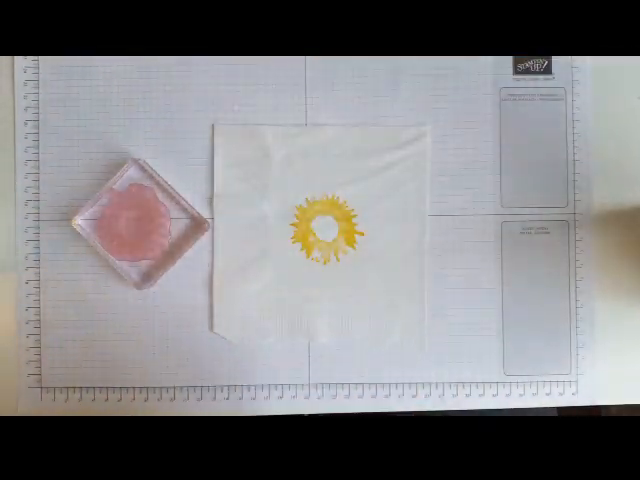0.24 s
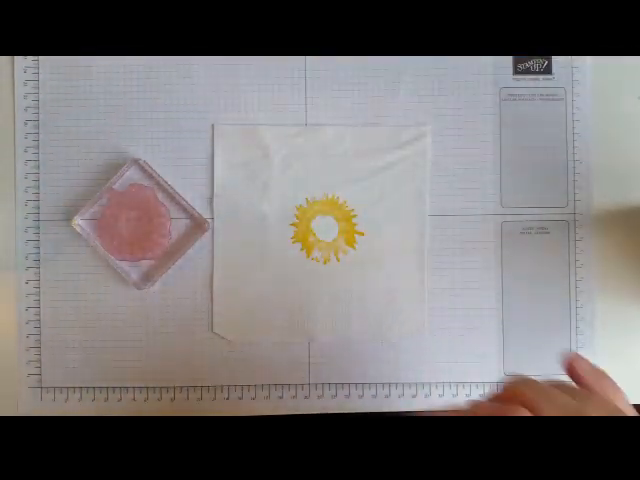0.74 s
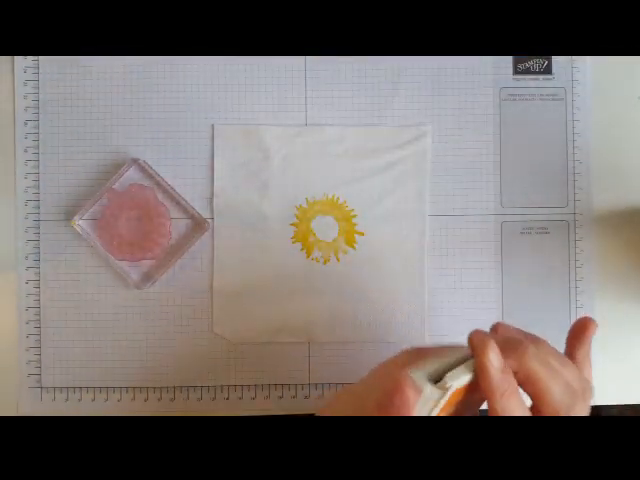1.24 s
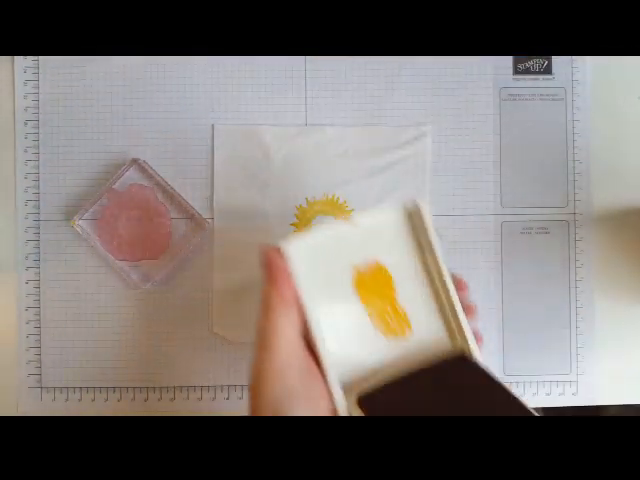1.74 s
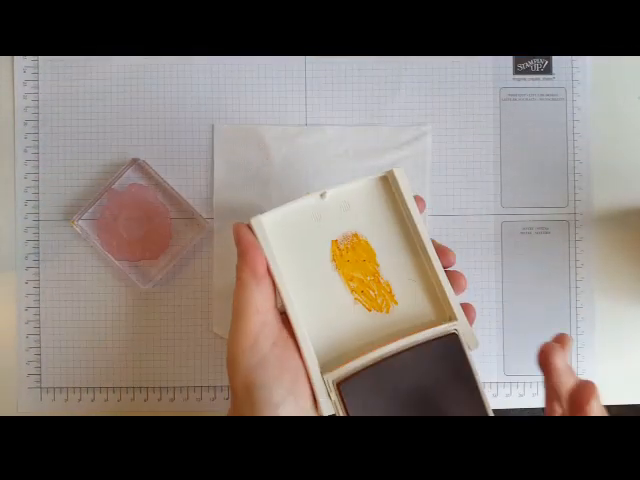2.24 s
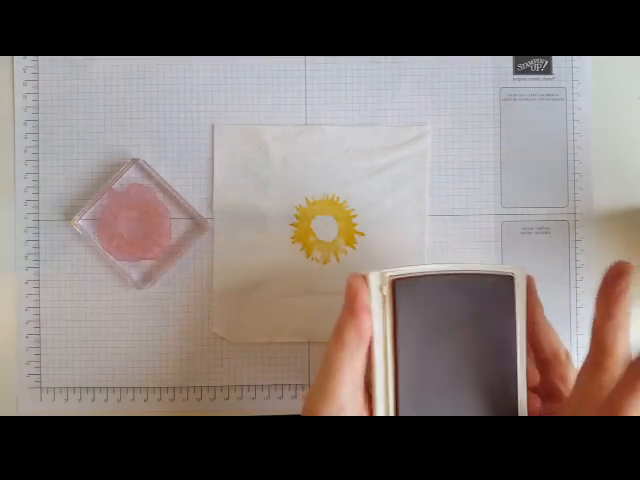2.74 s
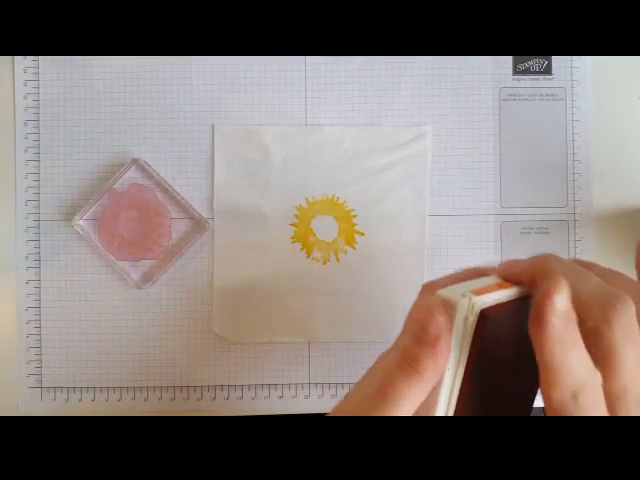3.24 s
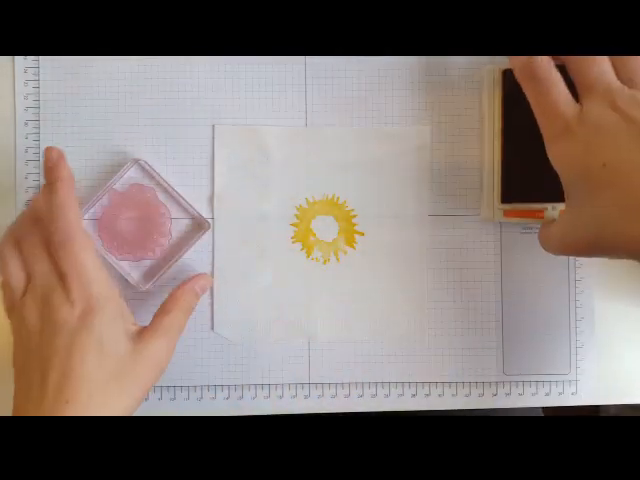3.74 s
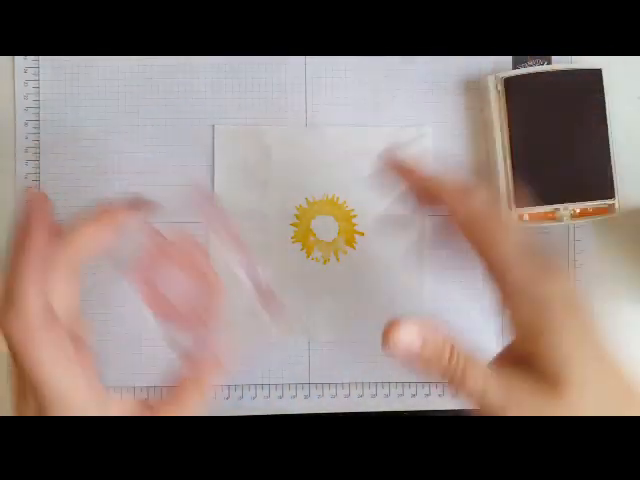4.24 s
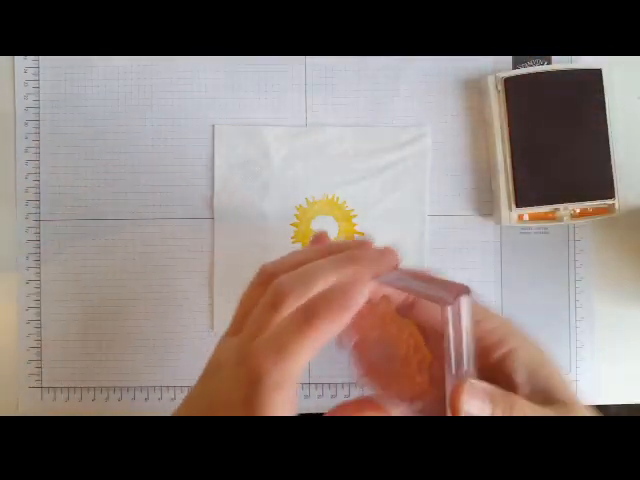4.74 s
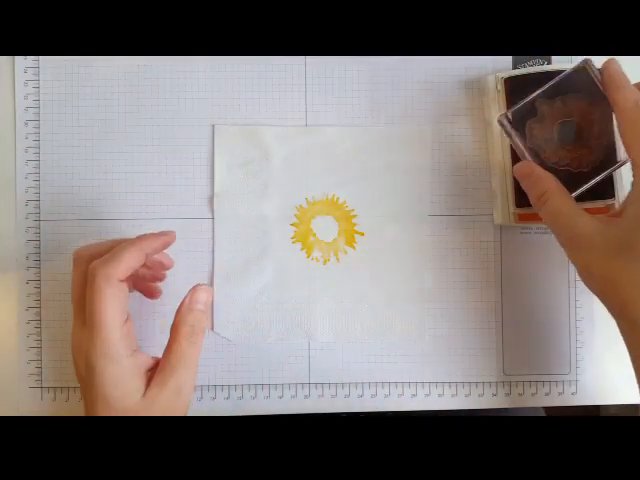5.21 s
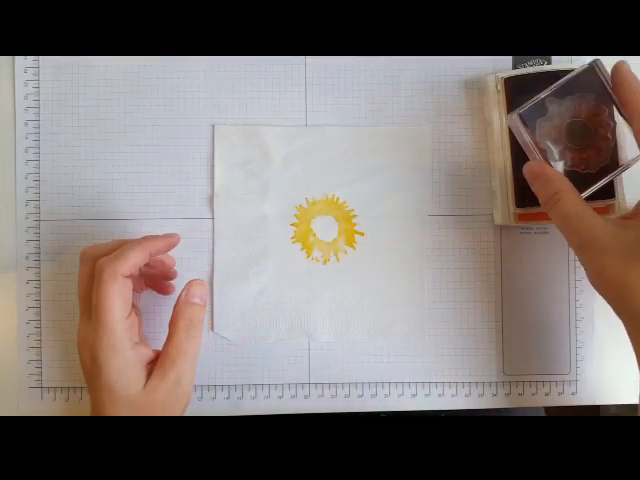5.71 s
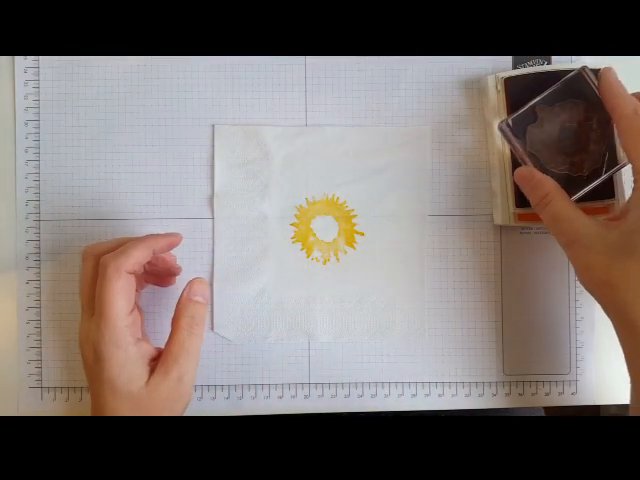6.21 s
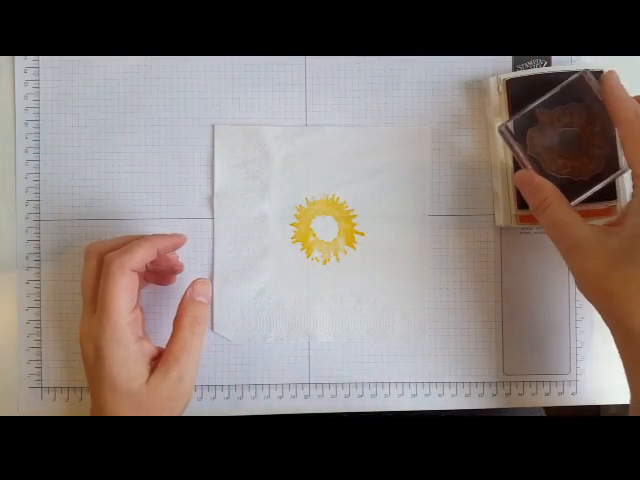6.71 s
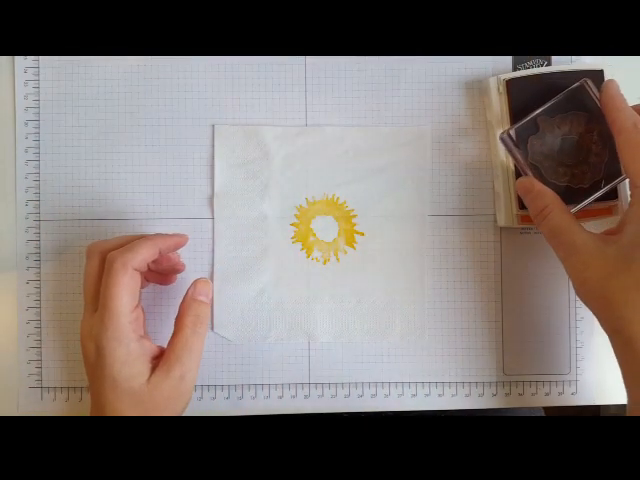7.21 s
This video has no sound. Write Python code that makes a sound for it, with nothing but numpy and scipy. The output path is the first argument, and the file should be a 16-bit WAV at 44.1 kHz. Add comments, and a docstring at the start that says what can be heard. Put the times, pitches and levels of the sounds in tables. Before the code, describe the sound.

Off-side clack and thin squeak, then plastic clicks, a scraping lid latching, a double set-down knock, and dull padded thumps with tacky crackles.

```python
"""A plastic ink pad case is prised open, slid shut until it latches and set down: blows and friction excite
damped modes of its walls and hollow tray. An acrylic stamp block then pats the pad five times, as soft pushes
that ring the table, and the tacky ink peels at each lift in strings of tiny decaying pings. Beforehand a clack
(filtered noise and modes) and a squeak (gliding sines) sound out of sight. Room echoes carry all of this over
a low, swelling rumble and a faint hiss of coloured noise."""
import sys
import numpy as np
from scipy import signal
from scipy.fft import rfft, irfft, next_fast_len
from scipy.io import wavfile
from scipy.ndimage import uniform_filter1d

SR = 44100
rng = np.random.default_rng(int(sys.argv[2]) if len(sys.argv) > 2 else 0)


def wrap_up_sound(samples):
    """Save the sound to the file named by the first command line argument, as 16-bit audio."""
    columns = np.atleast_2d(samples).T
    # keep every value between -1 and 1, then stretch to whole-number steps
    tamed = np.clip(columns, -1, 1)
    steps = np.round(tamed * 32767).astype(np.int16)
    wavfile.write(sys.argv[1], SR, steps)


N = 329338
T = np.arange(N) / SR
AGE = T[:SR // 2]  # seconds since a blow
BLOW_SIZE = SR // 50  # 20 ms: judges a blow's level, and holds the ring of one ink thread

# Clicks of the case. Each row: start in seconds, body level in dB, bass re body in dB, treble re body in dB,
# tray resonance in Hz, tray ring in dB.
CASE_CLICKS = [(.872, -51.5, 7.5, -12, 1160, -2), (.893, -45, -7, -4.5, 1340, -2),
               (1.001, -52.5, 2.5, -13, 1290, -1), (1.062, -41.5, -2, -5, 1090, -8),
               (1.118, -41.5, -4.5, -13.5, 1070, 10.5), (1.165, -59, 5, -12, 800, -4),
               (1.187, -50.5, 2, -33, 1207, 11.5), (1.3775, -28.5, -5, -12, 1054, -14),
               (1.557, -48.5, -8, -12.5, 1277, 5), (1.573, -41.5, -2, -20, 1398, 4.5),
               (1.599, -43, -10, -31, 1192, 6), (1.611, -52.5, -9.5, -24.5, 2500, 9),
               (1.758, -46.5, 2, -22, 1022, 5), (1.835, -37.5, -2, -32, 1250, 10.5),
               (1.866, -47, 0, -23, 950, 9), (1.879, -25.5, -10, -27.5, 1192, 9.5),
               (1.921, -37.5, 0.5, -23, 1166, 5), (1.933, -46, -5, -18, 2100, -1),
               (1.960, -39.5, 2, -11, 890, -4), (1.967, -35.5, -9.5, -26, 1065, 2),
               (2.006, -40.5, -15, -32, 1110, 6), (2.342, -60, 1, -24, 1125, 12),
               (2.433, -48, -11.5, -16, 3104, -1), (2.452, -39, -4.5, -21, 2715, 2.5),
               (2.4841, -33, -9.5, -18, 2452, 3), (2.492, -41, -9, -22, 2316, 3.5),
               (2.5185, -42, -12, -20.5, 2400, 5), (2.533, -43.5, -11.5, -20, 1196, 3),
               (2.5785, -43, -15.5, -17.5, 3016, -5), (2.594, -43, -15, -20, 1603, 4.5),
               (2.634, -25.5, -19.5, -7.5, 1077, 3), (2.643, -40, -5.5, -20.5, 1748, 16),
               (2.978, -64.5, -13, 0, 1180, 15), (2.998, -57.5, -14, 0.5, 1215, 23)]
# Crack of a click: decay when treble equals body, dB of dullness that halve it, upper limit
CRACK_T60_S, CRACK_HALVING_DB, CRACK_LONGEST_S = 0.049, 25, 0.033
# Wall resonances of the case. Each row: frequency in Hz, level in dB, t60 in seconds.
CASE_MODES = [(385, -0.5, 0.056), (430, -12.5, 0.04), (498, -3.5, 0.067), (577, -12, 0.064),
              (783, -12, 0.11), (1620, -5.5, 0.037), (1820, -1.5, 0.047), (2080, -0.5, 0.035),
              (2086, 2, 0.049), (2343, -6.5, 0.06), (2580, -9.5, 0.083), (2788, -6.5, 0.055),
              (3445, -18, 0.058)]
# Spectrum of a blow on plastic. Each row: frequency in Hz, level in dB.
PLASTIC_COLOUR = [(150, -18.5), (280, -7.5), (800, -6.5), (1200, 2), (1500, -2.5), (2300, 0.5),
                  (3200, -4.5), (4500, -9), (6500, -14), (8500, -12), (11000, -21.5), (15000, -27.5)]

# Blows of the latching lid. Each row: start in seconds, level in dB.
LATCH_BLOWS = [(2.7665, -36), (2.7686, -19.5), (2.7734, -30.5)]
# Resonances of the shut case. Each row: frequency in Hz, level in dB, t60 in seconds.
LATCH_MODES = [(276.6, -6.5, .07), (372, -2.5, 0.065), (637, -2, .03), (1077, 6, .027), (1707, -3.5, 0.014),
               (2062, 4, 0.03), (2490, 1, .024), (3500, 0.5, .016)]
# Spectrum of the latch's snap. Each row: frequency in Hz, level in dB.
LATCH_COLOUR = [(200, -13), (330, -1), (480, 0), (900, 2.5), (1400, -5.5), (2100, 5), (3050, -6),
                (3600, -3), (4200, -13), (7500, -16.5), (9200, -16.5), (11000, -28), (15000, -33)]

# Push of the lid: start, time to reach full speed, time at full speed, braking decay
SLIDE_START_S, SLIDE_ATTACK_S, SLIDE_HOLD_S, SLIDE_T60_S = 2.3, 0.22, 0.074, 0.2
# Level of the lid at full speed, and how unevenly it catches on the rails
SLIDE_DB, SLIDE_JUDDER_DB = -47.5, -2
# Light rustle of the grip while the case is being opened
GRIP_START_S, GRIP_ATTACK_S, GRIP_HOLD_S, GRIP_T60_S = 0.89, 0.084, 0.93, 0.58
GRIP_DB, GRIP_WANDER_DB = -64.5, 6
# Fingers rubbing over the case. Each row: start in seconds, level in dB, length in seconds,
# brightness in dB (treble re the rest).
FINGER_RUBS = [(0.548, -67, 0.29, 7.5), (0.767, -61, .17, 3.5), (1.097, -44, 0.047, -11),
               (1.233, -47.5, 0.053, -4.5), (1.548, -41.5, 0.056, -8), (1.694, -54, .06, -4),
               (2.963, -55, .11, -6), (3.358, -52.5, .049, 4.5)]
# Spectrum of plastic rubbing. Each row: frequency in Hz, level in dB.
SLIDE_COLOUR = [(250, -19.5), (400, -2.5), (520, 0), (800, -6), (1100, 1.5), (1450, -4.5), (2200, 0),
                (3000, -11.5), (3700, -13), (4300, -16.5), (5400, -13.5), (6300, -21), (9000, -18.5),
                (12000, -26.5), (15000, -37)]
# Scrapes of the binding lid. Each row: start in seconds, level in dB, length in seconds, centre in Hz.
LID_SCRAPES = [(1.247, -55.5, 0.039, 2250), (2.317, -58.5, 0.02, 1183), (2.404, -47.5, .04, 1145),
               (2.426, -48, 0.026, 2696), (2.503, -42, .055, 2200), (2.548, -40.5, .064, 1700)]

# Knocks of the case on the table. Each row: start in seconds, level in dB, contact cut-off in Hz,
# table thud in dB, 0 on its edge or 1 flat.
LANDINGS = [(3.863, -25.5, 2185, -37.5, 0), (3.9703, -20.5, 7960, -31, 1), (3.9793, -25.5, 6000, -42, 1)]
# Resonances of the case lying on the table. Each row: frequency in Hz, t60 in seconds,
# level in dB when struck on its edge, level in dB when struck flat.
LANDING_MODES = [(379.5, 0.087, -10, -10), (495, 0.065, -21.5, -3.5), (650.5, 0.033, 1.5, -15),
                 (766, 0.036, 3, -0.5), (1164, 0.033, -2, 2), (1530, .018, 10.5, -14),
                 (1680, .022, 1.5, -7.5), (2040, 0.018, -10, -4), (2766, 0.019, -17.5, -1),
                 (3700, .02, -23, -10.5), (4100, 0.013, -23.5, -8.5)]
# Spectrum of the case hitting the table. Each row: frequency in Hz, level in dB.
LANDING_COLOUR = [(200, -2), (400, 3), (600, -5), (800, -2.5), (1130, 6), (1350, -6), (1600, 0.5),
                  (2400, 1), (3200, -7), (5000, -14.5), (7500, -25), (9500, -21.5), (15000, -36.5)]
# Resonances of the table. Each row: frequency in Hz, level in dB, t60 in seconds.
TABLE_MODES = [(47.9, -1.5, 0.19), (70, -5, 0.37), (136, 2.5, 0.17), (203.4, -4, 0.042), (290.6, 9, 0.086),
               (404, 2.5, 0.08), (483, -6, 0.22), (565, -18.5, 0.047), (767, -13, .06)]

# Pats of the block on the pad. Each row: start in seconds, level in dB, push length in seconds,
# knock of the case in dB re the thud.
PATS = [(5.41, -43.5, 0.0041, -16.5), (5.973, -36.5, 0.0043, -9.5), (6.5107, -33, 0.0064, -14.5),
        (6.916, -35.5, 0.006, -18.5), (7.175, -35, 0.0025, -9.5)]
# Peels of the stamp off the ink. Each row: start in seconds, level in dB, length in seconds,
# pitch of the last threads in Hz, fine fizz in dB re the peel.
PEELS = [(5.693, -55, .035, 2460, -36), (6.292, -59.5, 0.048, 1480, -34), (6.761, -52.5, 0.033, 3000, -15),
         (7.067, -55.5, .05, 2670, -26), (7.298, -58.5, 0.07, 3000, -17)]
# Ink threads: snaps per second, pitch of the first ones
THREAD_RATE, THREAD_HZ = 600, 920
# Scatter of log pitch, scatter of strength, ring time
THREAD_SPREAD, THREAD_SCATTER_DB, THREAD_T60_S = 0.35, 6, 0.0063
# Spectrum of the smearing ink. Each row: frequency in Hz, level in dB.
PEEL_COLOUR = [(250, 21), (450, 14), (750, -19), (1100, 20), (1600, -14), (2600, -7.5), (4000, -40.5),
               (12000, -61)]
# The case rocks back on the table as the block lifts. Each row: start in seconds, level in dB.
ROCKS = [(6.349, -54), (6.758, -52.5)]
# Fingers tick on the block. Each row: start in seconds, level in dB.
TICKS = [(4.51, -67.5), (6.179, -71)]

# Blows of the clack across the room. Each row: start in seconds, level in dB, contact cut-off in Hz.
CLACK_BLOWS = [(0.3317, -33, 5000), (.3402, -31.5, 5960), (.3458, -33, 1800), (.3505, -34.5, 1400),
               (.3725, -41, 690)]
# Resonances of the clattering object. Each row: frequency in Hz, level in dB, t60 in seconds.
CLACK_MODES = [(180.6, -45, 0.91), (223.7, -47, 1), (277.6, -36, 0.64), (546, -33.5, 0.15),
               (746, -50, 0.63)]
# Spectrum of the clack. Each row: frequency in Hz, level in dB.
CLACK_COLOUR = [(130, -25), (185, 0.5), (280, 5), (350, 8.5), (550, 7), (640, 4), (820, 6.5), (1350, -2),
                (2500, -3.5), (4100, -16), (12000, -37)]
# Spectrum of the click of the object's edge. Each row: frequency in Hz, level in dB.
EDGE_COLOUR = [(2500, -15), (4000, -12), (4800, 8), (6500, -10), (8300, 0.5), (11000, -7), (15000, -12)]
# Soft brush leading into the clack: start, length, level
BRUSH_S, BRUSH_LENGTH_S, BRUSH_DB = .3, 0.029, -53
# Course of the thin squeak. Each row: time in seconds, pitch in Hz, level in dB.
SQUEAK_COURSE = [(.385, 1890, -66), (.424, 1840, -51), (.494, 1880, -59), (.522, 1827, -56),
                 (.558, 1850, -62), (.585, 1848, -57.5), (.624, 1823, -54), (.645, 1818, -71),
                 (.85, 1864, -73)]
# Lower, weaker partial of the squeak: mean pitch, level
PARTNER_HZ, PARTNER_DB = 1460, -70

# Spectrum of the room's tail. Each row: frequency in Hz, level in dB.
ROOM_COLOUR = [(80, -2), (250, 2.5), (600, -0.5), (1100, -1.5), (1600, -5), (2500, -2.5), (4000, 0),
               (8000, 0.5), (10500, -1), (15000, -14)]
# Swells of the rumble. Each row: start in seconds, level in dB.
SWELLS = [(.42, -53.5), (1.619, -51.5), (2.8, -42), (4.29, -54), (6.988, -41)]
SWELL_ATTACK_S, SWELL_HOLD_S, SWELL_T60_S = .07, 0.06, 2.1
# Resting level of the rumble and its slow unevenness
RUMBLE_DB, RUMBLE_WANDER_DB = -56, 2.5
# Spectrum of the rumble. Each row: frequency in Hz, level in dB.
RUMBLE_COLOUR = [(33, -12), (40, -9), (60, -10), (90, -11), (110, -2.5), (129, 4), (145, -10), (175, -17),
                 (220, -20.5), (250, -25.5), (285, -20), (350, -30.5), (600, -61.5)]
# Spectrum of the hiss. Each row: frequency in Hz, level in dB.
HISS_COLOUR = [(180, -32.5), (300, -10), (437, -3.5), (498, -2.5), (691, -3.5), (1190, -11.5), (2690, -15),
               (3220, -18), (14000, -26), (15000, -24)]
HISS_DB = -68.5
TOP_HZ = 14900


def amp(db):
    """Level law: decibels to amplitude gain."""
    return 10 ** (np.asarray(db) / 20)


def unit(x, size=None):
    """Normalisation: scale to rms 1, judged on the first samples if a size is given."""
    return x / np.sqrt(np.mean(x[..., :size] ** 2) + 1e-20)


def fade(t60):
    """Damping: exponential decay by 60 dB in t60 seconds."""
    return np.exp(-np.log(1000) * AGE / t60)


def onset(build_s):
    """Inertia: a vibration builds up exponentially towards full strength."""
    return 1 - np.exp(-AGE / build_s)


def envelope(start_s, attack_s, hold_s, t60):
    """Amplitude envelope: a straight rise, a hold and an exponential release."""
    age = T - start_s
    release = np.exp(-np.log(1000) * np.maximum(age - attack_s - hold_s, 0) / t60)
    return np.clip(age / attack_s, 0, 1) * release


def wander(count):
    """Slow random modulation: spread of 1, changing about count times a second."""
    return unit(uniform_filter1d(rng.standard_normal(N), SR // count))


def band(x, hz, kind):
    """Linear filtering: a fourth-order Butterworth design."""
    return signal.sosfilt(signal.butter(4, hz, kind, fs=SR, output="sos"), x)


def soften(x, hz):
    """Contact stiffness: a softer contact acts as a gentle low-pass."""
    return signal.sosfilt(signal.butter(2, hz, fs=SR, output="sos"), x)


def colour(x, points):
    """Spectral shaping: multiply the spectrum by a curve through (Hz, dB) points."""
    hz, db = np.transpose(points)
    size = next_fast_len(x.shape[-1])
    f = np.fft.rfftfreq(size, 1 / SR) + 1
    gain = amp(np.interp(np.log(f), np.log(hz), db))
    gain = gain * np.minimum(f / hz[0], 1) ** 4  # steep cut below the first point
    return unit(irfft(rfft(x, size) * gain, size)[..., :x.shape[-1]])


def noise(size, spread, apart_hz=650, bass_hz=150):
    """Spatial coherence: at two close microphones noise is alike in the bass, less related higher up."""
    padded = next_fast_len(size)
    mid, side = rfft(rng.standard_normal((2, padded)))
    f = np.fft.rfftfreq(padded, 1 / SR)
    side = side * spread * (f ** 2 + bass_hz ** 2) / (f ** 2 + apart_hz ** 2)
    return unit(irfft([mid + side, mid - side], padded)[:, :size])


def grit(size, rate, scatter_db, smooth_db=-10, slip_s=0.00061):
    """Stick-slip friction: uneven tiny slips at random moments over a smooth rubbing noise."""
    chance, strength = rng.random(size), rng.standard_normal(size)
    slips = (chance < rate / SR) * amp(scatter_db * np.clip(strength, -2, 2))
    slips = signal.lfilter([1], [1, -np.exp(-1 / (slip_s * SR))], slips)
    return unit(noise(size, 1.0) * (unit(slips) + amp(smooth_db)))


def ring(modes, detune=0.022):
    """Modal synthesis: a sum of damped sines, randomly detuned, with alternating signs."""
    total = 0
    for k, (hz, db, t60) in enumerate(modes):
        shifted_hz = hz * (1 + detune * rng.standard_normal())
        total = total + (-1) ** k * amp(db) * np.sin(2 * np.pi * shifted_hz * AGE) * fade(t60)
    return total


def resonate(x, modes):
    """Forced vibration: convolve a driving signal with the ring of the modes."""
    return unit(signal.oaconvolve(x, ring(modes)[None], axes=1)[:, :x.shape[1]])


def add(out, s, x, pan_db=0):
    """Superposition: mix a sound in at its time, with a level difference between the channels."""
    i = int(s * SR)
    x = x * amp(np.array([[pan_db], [-pan_db]]) / 2)
    out[:, i:i + x.shape[1]] += x[:, :N - i]


def off_centre(x, count):
    """Arrival-time difference: sound from the right reaches the left microphone count samples later."""
    return np.array([np.roll(x[0], count), x[1]])


def room(x, wet_db, t60=0.36, treble_t60=0.33, echo_db=-13, echo_s=.0095, split_hz=1700):
    """Reverberation: an early wall echo, then a diffuse tail whose treble dies first."""
    tail = colour(noise(len(AGE), 1), ROOM_COLOUR)
    tail = band(tail, split_hz, "low") * fade(t60) + band(tail, split_hz, "high") * fade(treble_t60)
    tail = unit(tail * np.clip(AGE / 0.0036 - .5, 0, 1)) * amp(wet_db) / np.sqrt(len(AGE))
    tail[0, int(echo_s * SR)] += amp(echo_db)
    tail[1, int((echo_s + .0004) * SR)] += amp(echo_db)
    return x + signal.fftconvolve(x, tail, axes=1)[:, :N]


def plastic(bass_db, treble_db, tray_hz, tray_db, contact_t60, modes_db=-11, tray_t60=0.023,
            build_s=0.0012, tick_db=6, tick_t60=.008):
    """Impact excitation: tick, crack, wall modes and tray; bass and treble are set against the body."""
    contact = colour(noise(len(AGE), 0.73), PLASTIC_COLOUR)
    crack = contact * fade(contact_t60)
    tray = ring([(tray_hz, tray_db, tray_t60)])
    blow = crack + amp(modes_db) * ring(CASE_MODES) + tray
    blow = blow * onset(build_s)  # the walls take a moment to get moving
    bass, body = band(blow, 700, "low"), band(blow, [700, 3500], "band")
    tick = contact * amp(tick_db) * fade(tick_t60)
    treble = band(crack + tick, 3200, "high") * onset(build_s / 2)
    blow = unit(body, BLOW_SIZE) + amp(bass_db) * unit(bass, BLOW_SIZE)
    return blow + amp(treble_db) * unit(treble, BLOW_SIZE)


def ink_case(pan_db=1.2):
    """Impacts of catch, hinge and lid: bright clicks crack for longer than dull ones, up to a limit."""
    out = np.zeros((2, N))
    for s, db, bass_db, treble_db, tray_hz, tray_db in CASE_CLICKS:
        t60 = min(CRACK_T60_S * 2 ** (treble_db / CRACK_HALVING_DB), CRACK_LONGEST_S)
        add(out, s, amp(db) * plastic(bass_db, treble_db, tray_hz, tray_db, t60), pan_db)
    return out


def latch(contact_t60=0.038, modes_db=-6, build_s=0.00059):
    """Snap-through: the lid rides over its catch, snaps home and rebounds; the shut case rings."""
    out = np.zeros((2, N))
    for s, db in LATCH_BLOWS:
        snap = colour(noise(len(AGE), 0.87), LATCH_COLOUR) * fade(contact_t60)
        snap = snap + amp(modes_db) * ring(LATCH_MODES, detune=0.0092)
        add(out, s, amp(db) * unit(snap * onset(build_s), BLOW_SIZE))
    return out


def friction(modes_db=-7):
    """Friction-driven resonance: lid on rails, louder with speed, rings walls and tray; fingers shift grip."""
    slips = grit(N, rate=1600, scatter_db=3.0, slip_s=0.001)
    walls = resonate(slips, CASE_MODES + [(1160.0, 3, 0.04), (3070, 2.2, 0.066)])
    rubbing = unit(colour(slips, SLIDE_COLOUR) + amp(modes_db) * walls)
    speed = envelope(SLIDE_START_S, SLIDE_ATTACK_S, SLIDE_HOLD_S, SLIDE_T60_S)
    slide = speed * amp(SLIDE_DB + SLIDE_JUDDER_DB * wander(count=90))
    grip = envelope(GRIP_START_S, GRIP_ATTACK_S, GRIP_HOLD_S, GRIP_T60_S)
    grip = grip * amp(GRIP_DB + GRIP_WANDER_DB * wander(count=12))
    out = rubbing * (slide + grip)
    for s, db, length, bright_db in FINGER_RUBS:
        rub = colour(grit(int(length * SR), rate=890, scatter_db=4.0), SLIDE_COLOUR)
        rub = unit(band(rub, 1980, "low") + amp(bright_db) * band(rub, 2900, "high"))
        add(out, s, amp(db) * rub * np.hanning(rub.shape[1]) ** .5)
    return out


def scrapes(width=1.35, broad_db=-4):
    """Stick-slip in a narrow band: the lid binds in short, gritty scrapes about their own centres."""
    out = np.zeros((2, N))
    for s, db, length, hz in LID_SCRAPES:
        slips = grit(int(length * SR), rate=800, scatter_db=4.0, smooth_db=-11.5, slip_s=.0005)
        narrow = unit(band(slips, [hz / width, hz * width], "band"))
        scrape = narrow + amp(broad_db) * colour(slips, SLIDE_COLOUR)
        add(out, s, amp(db) * unit(scrape * np.hanning(scrape.shape[1]) ** .5))
    return out


def thud(push_s):
    """Pulse excitation of the table: the longer the soft push, the fewer high modes sound."""
    push = AGE * np.exp(-10 * AGE / push_s)
    return unit(signal.fftconvolve(ring(TABLE_MODES), push)[:len(AGE)], BLOW_SIZE)


def set_down(contact_t60=0.027, build_s=0.00093, modes_db=-6):
    """Strike position selects modes: the case lands dully on one edge, slaps flat and rebounds."""
    out = np.zeros((2, N))
    for s, db, top_hz, thud_db, flat in LANDINGS:
        modes = [(hz, flat_db if flat else edge_db, t60) for hz, t60, edge_db, flat_db in LANDING_MODES]
        knock = colour(noise(len(AGE), 1.0), LANDING_COLOUR) * fade(contact_t60)
        knock = knock + amp(modes_db) * ring(modes, detune=0.021)
        knock = soften(knock * onset(build_s), top_hz)
        add(out, s, amp(db) * unit(knock, BLOW_SIZE), pan_db=0.7)
        table = unit(band(thud(push_s=0.0048), 82, "high"), BLOW_SIZE)
        add(out, s, amp(thud_db) * table, pan_db=2.0)
    return out


def peel(length, last_hz, fizz_db, pad_ring_db=-9, smear_db=-11):
    """Rupture of ink threads: snaps of mixed pitch, the thin ones ever higher, ring the hollow under the pad."""
    size = int(length * SR) + BLOW_SIZE
    snaps, count = np.zeros((2, size)), max(int(THREAD_RATE * length), 2)
    for k, (late, pitch, strength, side, thin) in enumerate(rng.standard_normal((count, 5))):
        lift = np.clip((k + 2 * late) / count, 0, 1)
        rise = (last_hz / THREAD_HZ) ** (lift * (thin > 0))  # only thin threads follow the lift
        hz = THREAD_HZ * np.exp(THREAD_SPREAD * pitch) * rise
        ping = np.sin(2 * np.pi * hz * AGE[:BLOW_SIZE]) * fade(THREAD_T60_S)[:BLOW_SIZE]
        gain = amp(THREAD_SCATTER_DB * strength) * min(THREAD_HZ / hz, 1) ** 0.23
        add(snaps, lift * length, gain * ping, side)
    smear = grit(size, rate=900, scatter_db=-1) * np.hanning(size) ** .5
    fizz = unit(soften(band(smear, 1300, "high"), 4000))
    pad = resonate(snaps, [(778, -10.5, 0.073), (996, -5, .06), (1180, 5, 0.022), (2650, 3, 0.062)])
    threads = unit(snaps) + amp(pad_ring_db) * pad + amp(smear_db) * colour(smear, PEEL_COLOUR)
    return unit(threads) + amp(fizz_db) * fizz


def stamp():
    """Soft impact and adhesion: rubber lands on foam and crackles off wet ink; fingers tick on the acrylic."""
    out = np.zeros((2, N))
    for s, db, push_s, knock_db in PATS:
        knock = plastic(bass_db=-4.0, treble_db=-42, tray_hz=755, tray_db=-6.5, contact_t60=0.046,
                        modes_db=-17.5, build_s=0.0023)
        pat = thud(push_s) + amp(knock_db) * unit(soften(knock, 820), BLOW_SIZE)
        add(out, s, amp(db) * pat, pan_db=2.0)
    for s, db, length, last_hz, fizz_db in PEELS:
        add(out, s, amp(db) * peel(length, last_hz, fizz_db), pan_db=0.5)
    for s, db in ROCKS:
        rock = unit(band(thud(push_s=0.0048), 135, "high"), BLOW_SIZE)
        add(out, s, amp(db) * rock, pan_db=2.0)
    for s, db in TICKS:
        tick = ring([(1100, 4.0, 0.034), (1270, 10.0, 0.014), (1620, 0, .02)])
        add(out, s, amp(db) * unit(tick, BLOW_SIZE))
    return out


def far_clack(edge_db=-44, edge_t60=0.047, modes_db=-4, blow_t60=0.034, build_s=0.00076):
    """Repeated impact: a hard object brushes a surface, lands on its edge and clatters, ending duller."""
    out = np.zeros((2, N))
    first_s = CLACK_BLOWS[0][0]
    for s, db, top_hz in CLACK_BLOWS:
        blow = colour(noise(len(AGE), 1.0), CLACK_COLOUR) * fade(blow_t60)
        blow = blow + ring([(550, -6.5, 0.045), (790, -12, 0.036)], detune=0.019)
        add(out, s, amp(db) * unit(soften(blow * onset(build_s), top_hz), BLOW_SIZE))
    edge = colour(noise(len(AGE), 1.0), EDGE_COLOUR) * fade(edge_t60) * onset(build_s)
    add(out, first_s, amp(edge_db) * unit(edge, BLOW_SIZE))
    add(out, first_s, amp(modes_db) * ring(CLACK_MODES, detune=0))
    brush = colour(noise(int(BRUSH_LENGTH_S * SR), 0.94), CLACK_COLOUR)
    add(out, BRUSH_S, amp(BRUSH_DB) * brush * np.linspace(0, 1, brush.shape[1]) ** .5)
    return room(off_centre(out, count=9), wet_db=-1.0)


def squeak():
    """Frequency modulation: a thin, unsteady tone swells in spurts, with a lower partial in fixed ratio."""
    s, hz, db = np.transpose(SQUEAK_COURSE)
    pitch = np.interp(T, s, hz) * (1 + .006 * wander(count=150))
    phase = 2 * np.pi * np.cumsum(pitch) / SR
    upper = amp(np.interp(T, s, db)) * envelope(s[0], .01, s[-1] - s[0], .1) * np.sin(phase)
    lower = amp(PARTNER_DB) * envelope(s[0], 0.094, 0.18, .6) * np.sin(phase * PARTNER_HZ / hz.mean())
    return room(np.array([upper + lower] * 2), wet_db=-5.5)


def background(rumble_pan_db=2.3):
    """Filtered noise: a low rumble swells quickly and ebbs slowly under an even hiss."""
    out = amp(HISS_DB) * colour(noise(N, 1.0), HISS_COLOUR)
    swells = sum(amp(db) * envelope(s, SWELL_ATTACK_S, SWELL_HOLD_S, SWELL_T60_S) for s, db in SWELLS)
    strength = np.hypot(amp(RUMBLE_DB), swells) * amp(RUMBLE_WANDER_DB * wander(count=4))
    add(out, 0, strength * colour(noise(N, 1.0), RUMBLE_COLOUR), rumble_pan_db)
    return out


def scene():
    """Direct-to-reverberant ratio: the hands work close to the microphones; the clack is further and wetter."""
    hands = room(off_centre(ink_case() + latch() + friction() + scrapes(), count=3), wet_db=-9.5)
    table = room(off_centre(set_down() + stamp(), count=5), wet_db=-7.5)
    return hands + table + far_clack() + squeak() + background()


def record(dry):
    """Band limitation: nothing sounds below about 33 Hz or above about 15 kHz."""
    low_pass = signal.ellip(8, .2, 70, TOP_HZ, fs=SR, output="sos")
    return signal.sosfilt(low_pass, band(dry, 33, "high"))


dry = scene()
out = record(dry)
wrap_up_sound(out)
```